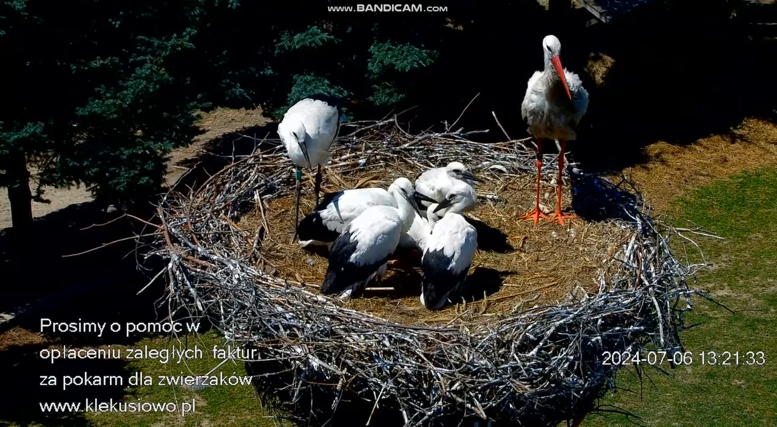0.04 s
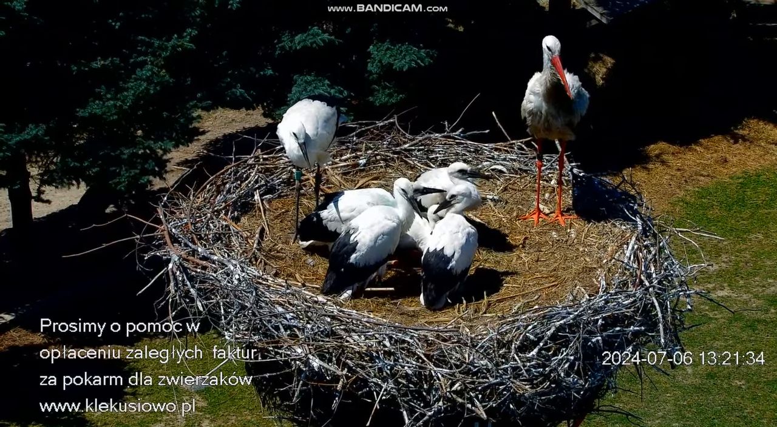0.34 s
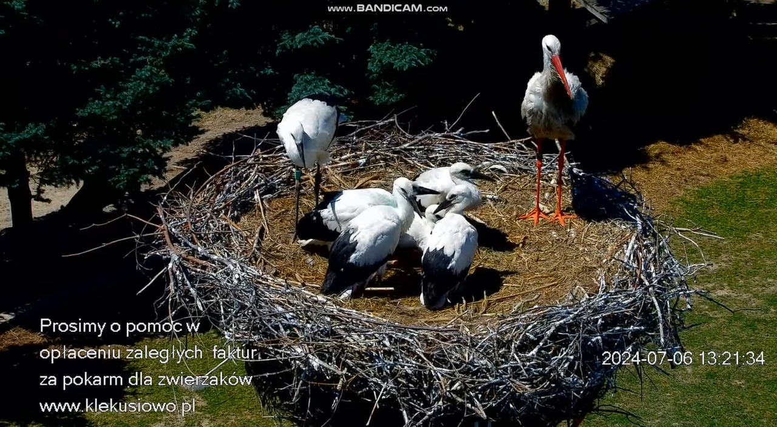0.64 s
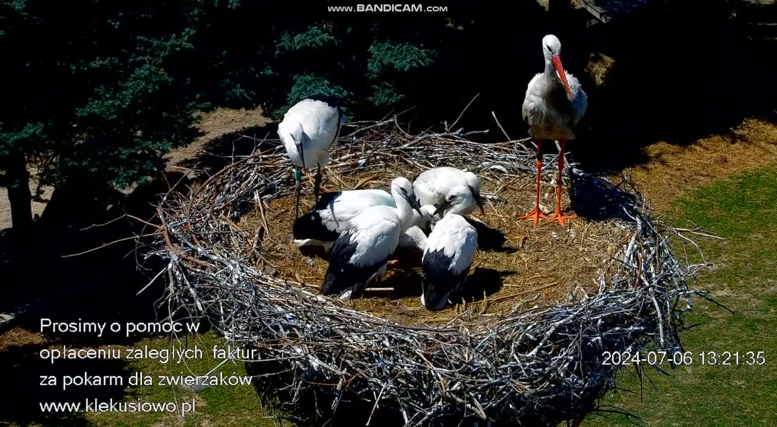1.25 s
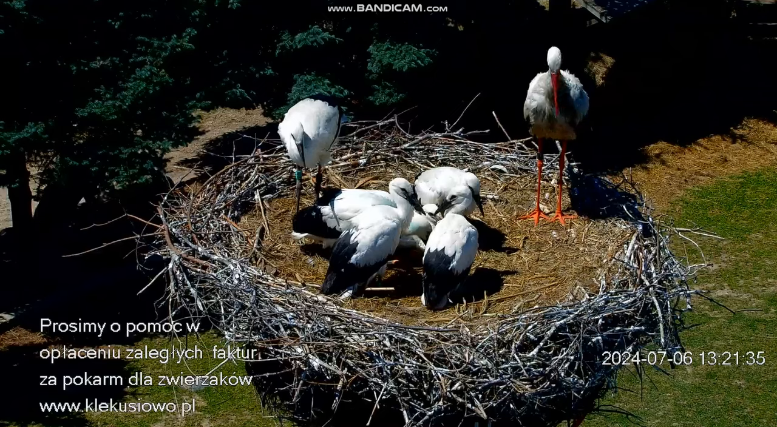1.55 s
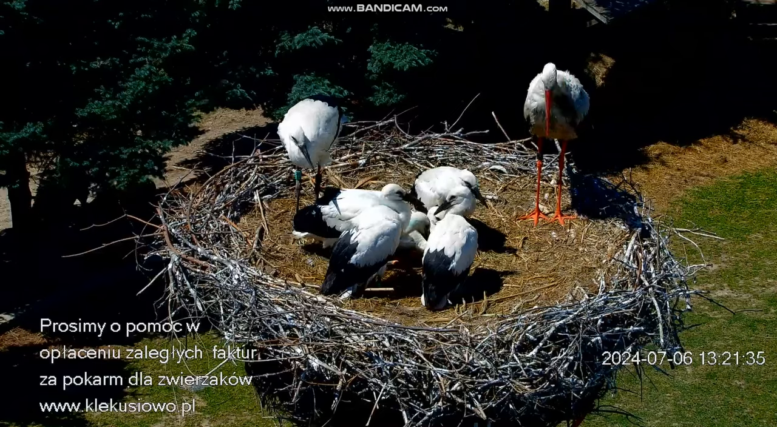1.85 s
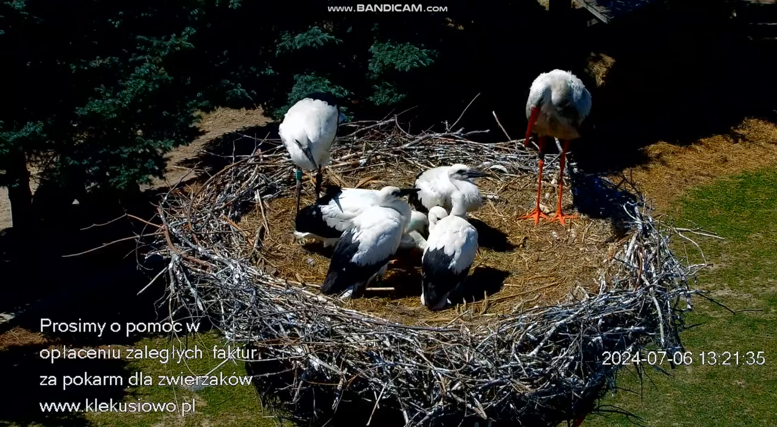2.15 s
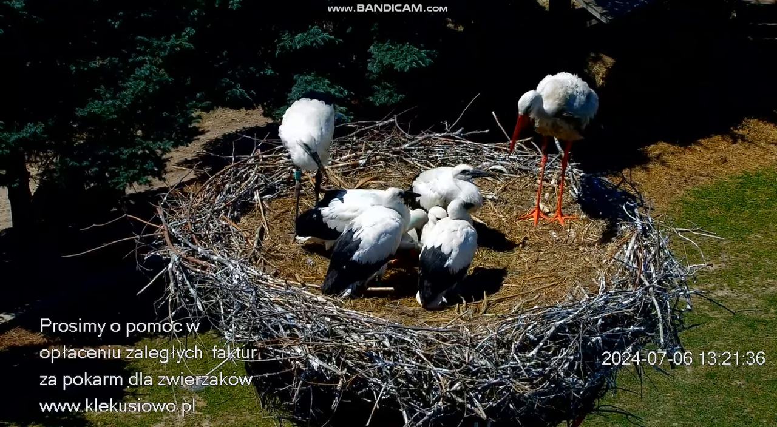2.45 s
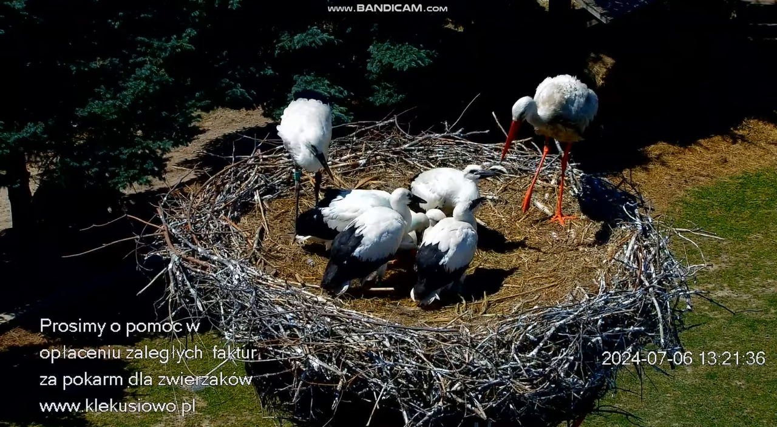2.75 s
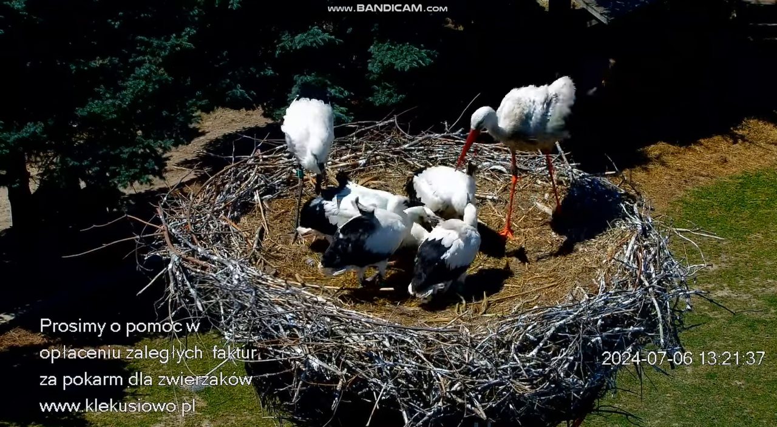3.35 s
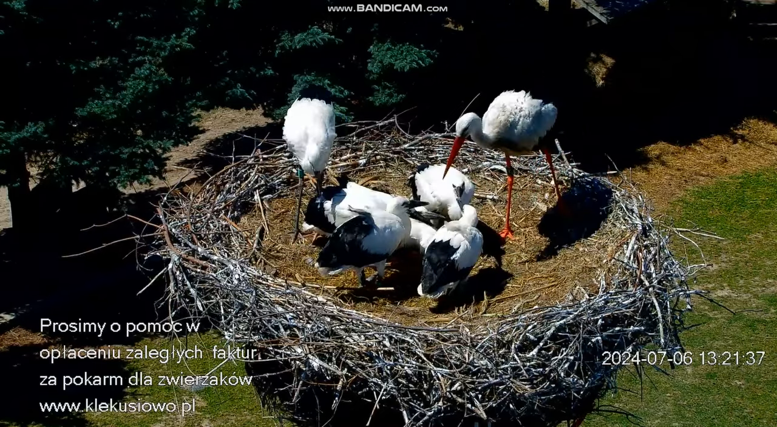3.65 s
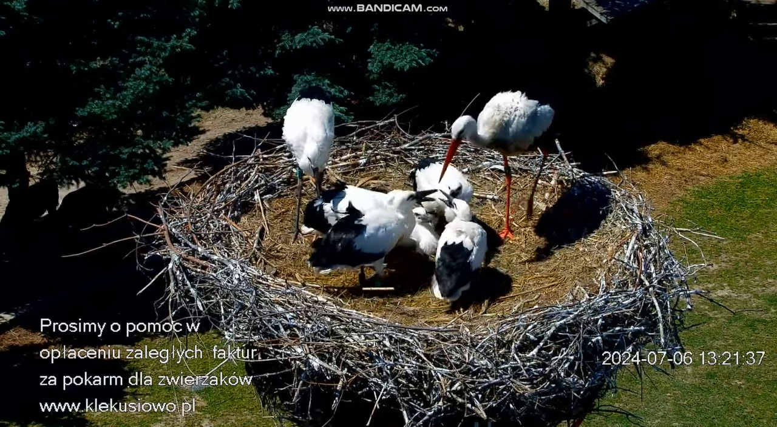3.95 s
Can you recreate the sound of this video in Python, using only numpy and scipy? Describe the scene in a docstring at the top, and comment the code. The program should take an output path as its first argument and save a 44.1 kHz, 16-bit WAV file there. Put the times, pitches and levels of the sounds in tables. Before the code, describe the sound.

Begging stork chicks hiss and whine, growing louder amid wind thumps and small bird chirps.

```python
"""At a big stork nest outdoors, the young beg, swelling as the adult steps closer.
Their thin whines and short squeals are gliding periodic tones; their long hisses are turbulent breath
filtered by throat resonances. A small songbird whistles three chirps, distant birds twitter and nest
twigs rustle. Trees and ground scatter the calls and chirps, while the pressure fluctuations of the
wind rumble and thump on the microphone."""
import sys
import numpy as np
from scipy import signal
from scipy.fft import rfft, irfft
from scipy.io import wavfile

SR = 44100
rng = np.random.default_rng(int(sys.argv[2]) if len(sys.argv) > 2 else 0)


def log_audio(samples):
    """Write samples as a 16-bit WAV file to the path given in sys.argv[1]."""
    # one column per channel
    frames = np.atleast_2d(samples).T
    # limit to full scale, then quantise
    limited = np.clip(frames, -1, 1)
    pcm = np.round(limited * 32767).astype(np.int16)
    wavfile.write(sys.argv[1], SR, pcm)


N = 176400

# Whines: (roughness [0-1], gain of each harmonic [dB], rows of (time [s], pitch [Hz], level [dB]))
WHINE_CONTOURS = [ (0.15, [-15.5, 0], [(0, 849, -48), (.1, 877, -38), (.19, 858, -44.5)]), (0.294, [1.3, 0],
                  [(.33, 711, -53), (.66, 745.4, -51)]), (0.36, [-13, -16.5, 1.5, -15.5],
                  [(.44, 443.6, -43.5), (.5, 432.8, -38), (.59, 416.3, -32), (.63, 435.2, -45),
                  (.68, 433.7, -29), (.75, 427.3, -29.5), (.84, 405, -43.5), (.94, 422.3, -41)]),
                  (0.13, [-14.5, -5, 3, -5.5], [(.712, 548, -28), (.726, 545, -24.5), (.765, 561, -27.5),
                  (.8, 554.7, -35), (.89, 532, -42)]), (0.3933, [-1.5, -2.5, -14.5, -5, -9],
                  [(1.45, 583, -51), (1.61, 545.4, -40), (1.655, 500.3, -42), (1.76, 491.2, -40.5),
                  (1.88, 455.6, -45.5)]), (0.25, [-40.5, 0], [(2.262, 965, -30.5), (2.279, 960, -19),
                  (2.305, 940.2, -23.5), (2.365, 954.6, -34)]), (0.347, [-25, 0, -13.5],
                  [(2.31, 751.2, -36), (2.374, 812.4, -33), (2.386, 812, -22), (2.43, 834.7, -30),
                  (2.51, 821, -25.5), (2.58, 776.6, -29.5), (2.64, 760, -25), (2.71, 715, -28)]),
                  (0.4977, [-17, 0, -12], [(2.77, 715, -30), (2.83, 682.2, -24), (2.9, 668.6, -23.5),
                  (2.96, 658.5, -33.5), (3.14, 622, -33), (3.22, 623, -42.5)]), (1, [-24.5, 0, -13.5],
                  [(3.35, 721, -37.5), (3.44, 770, -23.5), (3.51, 826.4, -24), (3.55, 810.6, -43),
                  (3.61, 801, -22)]), (0.2705, [-23, 2, -50, -15.5], [(3.53, 712.6, -24.5), (3.6, 675, -19),
                  (3.64, 694.4, -22.5), (3.76, 668.4, -22), (3.79, 688, -22), (3.82, 667.3, -25.5),
                  (3.868, 672.7, -20)]), (0.11, [-19, -3, -24.5, -12.5], [(3.94, 659, -33),
                  (3.963, 653, -23.5), (4, 691, -29)]), ]
# Hissing breaths: (start [s], end [s], start level [dB], end level [dB], start tuning [ratio],
# end tuning [ratio], then the gain of each of the four throat resonances [dB])
HISS_BREATHS = [ (0, 0.12, -47.5, -33.5, 1.05, 0.96, -3, -10, -17.5, -13),
                (0.098, 0.292, -34, -35.5, 0.97, 1.035, -10, -8, -7.5, -12),
                (0.31, 0.669, -35, -39, 1, 1.136, -8.5, -15.5, -11, -17.5),
                (0.69, 1.046, -28, -35, 0.9, 0.99, -15.5, -6.5, -10, -16),
                (1.058, 1.698, -40, -42, 0.95, 1.05, -16, -7.5, -3.5, -15),
                (1.698, 2.093, -54, -51, 1.05, 1.03, -5.5, 0, -23.5, -2.5),
                (2.089, 2.223, -46, -27.5, 0.9, 1.015, -6, -9.5, -6, -3),
                (2.22, 2.37, -35, -32.5, 0.94, 1.085, -8.5, 1, -15.5, -7.5),
                (2.386, 2.537, -31.5, -34.5, 1.06, 0.95, -8, 0.5, 2, -7.5),
                (2.532, 2.927, -26, -23.5, 1.012, 0.99, -7.5, -7.5, -6, -18.5),
                (2.923, 3.253, -23, -26, 1.002, 0.94, -5.5, -5.5, -13, -16.5),
                (3.253, 3.576, -26, -29, 1.022, 1.003, -3.5, -10, -7.5, -15),
                (3.584, 3.862, -28.5, -29.5, 0.86, 1.018, -3.5, -4, -6, -1.5), ]
# Throat resonances: (centre at tuning 1 [Hz], width [Hz])
THROAT_FORMANTS = [(1320, 332), (1740, 430), (2200, 480), (2620, 1060)]
# Wind rumble as gusts come and go: (time [s], level [dB])
GUST_LEVELS = [(0, -46), (.35, -43.5), (.5, -37.5), (0.701, -44), (0.922, -23), (1.05, -52), (1.171, -27),
               (1.299, -41.5), (1.899, -42), (2.25, -21), (2.47, -31.5), (2.68, -34.5), (3.178, -13),
               (3.541, -16.5), (3.771, -34), (3.969, -17.5)]
# Spectrum of the rumble: (frequency [Hz], relative density [dB])
RUMBLE_SPECTRUM = [(8, -6), (25, 2), (50, -2), (100, -10.5), (200, -19.5), (330, -19), (500, -38.5),
                   (900, -77)]
# Eddies striking the microphone: (time [s], duration [s], level [dB])
EDDIES = [(0.446, 0.027, -25), (0.525, 0.019, -14.5), (0.711, 0.016, -28.5), (0.808, 0.039, -24.5),
          (0.91, 0.033, -18.5), (1.185, 0.032, -43), (2.015, 0.026, -23.5), (2.104, 0.038, -22),
          (2.148, 0.017, -20.5), (2.181, 0.019, -12.5), (2.241, .025, -18), (2.28, 0.027, -22),
          (2.584, 0.022, -22.5), (2.643, 0.027, -14.5), (2.781, 0.02, -19.5), (2.846, 0.026, -20),
          (2.966, 0.025, -20), (3.155, 0.018, -8), (3.181, 0.0323, -7), (3.221, 0.02, -5),
          (3.392, 0.071, -10), (3.435, 0.028, -13), (3.473, 0.018, -9), (3.552, 0.043, -2.5),
          (3.619, 0.02, -10.5), (3.67, 0.029, -8), (3.797, 0.043, -21), (3.973, 0.077, -13.5)]
# Spectrum of an eddy lasting EDDY_S: (frequency [Hz], relative density [dB])
EDDY_SPECTRUM = [(15, 2), (50, -2), (120, -3), (220, -7), (330, -6.5), (480, -26), (800, -37.5),
                 (4000, -79)]
# Spectrum of the outdoor background: (frequency [Hz], relative density [dB])
AIR_SPECTRUM = [(20, -16.5), (200, -6), (320, 9), (480, 2), (800, -8.5), (1500, -13), (2500, -24.5),
                (5000, -16.5), (7200, -43)]
# Squeals: (start [s], end [s], start pitch [Hz], end pitch [Hz], level [dB])
SQUEAL_GLIDES = [(.16, .26, 1390, 1280, -39), (.28, .35, 1370, 1290, -44), (.68, .725, 490, 450, -36),
                 (.94, 1.0, 365, 340, -37), (1.191, 1.383, 1663, 1743, -45.5), (1.9, 2.05, 2020, 2080, -50),
                 (2.12, 2.24, 1220, 1380, -40.5), (2.53, 2.67, 1300, 1290, -34.5),
                 (3.03, 3.1, 1750, 1640, -30), (3.25, 3.33, 1450, 1340, -29.5)]
# Twig rustles: (time [s], duration [s], level [dB])
TWIG_RUSTLES = [(0.47, 0.039, -47), (3.567, 0.0195, -38), (3.763, 0.045, -50)]
# Spectrum of dry twigs: (frequency [Hz], relative density [dB])
TWIG_SPECTRUM = [(1500, -17.5), (3000, -11), (4800, 10), (6000, -7), (7200, -15)]
# Cheeps of far birds: (time [s], duration [s], pitch [Hz], level [dB])
FAR_CHEEPS = [(0.524, 0.015, 5340, -44), (1.537, 0.069, 3470, -46.5), (1.663, 0.069, 3330, -40.5),
              (3.061, 0.063, 4863, -52), (3.559, 0.044, 5163, -46)]
# One high swish: (time [s], duration [s], level [dB], centre [Hz], width [Hz])
HIGH_SWISH = (.68, .04, -65, 11500, 6500)
# Shape of the songbird's chirp: (time from onset [s], base pitch [Hz], relative level [dB])
CHIRP_CONTOUR = [(0, 3305, -16.5), (.008, 3544, -1), (0.018, 4440, -16.5), (0.036, 4946, -2.5),
                 (0.042, 4566, -14), (.049, 3966, 3.5), (.059, 3814, 7), (0.069, 3270, -9),
                 (.11, 2550, -41), (0.138, 3280, -10.5), (0.149, 3865, -3), (.165, 3625, -8.5),
                 (0.182, 4270, -39)]
# Its three chirps: (start [s], level [dB], pitch factor [ratio], gain at the highest pitch [dB])
CHIRP_CALLS = [(0.89, -29, 1.0, 2.5), (2.326, -28, 0.98, -2), (3.888, -30.5, 1, -5.5)]

CRY_EDGE_S, HISS_EDGE_S = 0.016, 0.0566
RASP_HZ, FLUTTER_DB, PITCH_WAVER = 110, 2.5, .008
JITTER, JITTER_HZ, SHIMMER_DB = 0.04, 141.8, 4.5  # depths at roughness 1
CHEST_HZ, CHEST_DB = 710.5, -14
RING_SPLIT, RING_WAVER = 0.05, .02  # fractions of a formant's centre frequency
EDDY_S, EDDY_DEEPENING, WIND_SIDE_DB = 0.024, 0.42, -29
GARDEN_T60_S, MIC_TOP_HZ, TOP_HZ, SELF_NOISE_DB = 0.61, 7000, 15700, -74.5


def undb(db):
    """Amplitude ratio of a level in decibels."""
    return 10 ** (np.asarray(db) / 20)


def unit(x):
    """Normalisation to rms 1."""
    return x / np.sqrt(np.mean(x ** 2) + 1e-20)


def clock():
    """Sampling instants in seconds."""
    return np.arange(N) / SR


def walk(rate_hz):
    """Low-pass noise: a smooth random wander of rms 1."""
    rolloff = 1 + (np.fft.rfftfreq(N, 1 / SR) / rate_hz) ** 4
    return unit(irfft(rfft(rng.standard_normal(N)) / rolloff, N))


def flutter(depth_db, rate_hz):
    """Random amplitude modulation: a gain of rms 1."""
    return unit(undb(depth_db * walk(rate_hz)))


def noise(spectrum):
    """Spectral shaping of white noise, at rms 1."""
    hz, db = np.array(spectrum).T
    f = np.maximum(np.fft.rfftfreq(N, 1 / SR), 1)
    gain = undb(np.interp(np.log(f), np.log(hz), db))
    return unit(irfft(rfft(rng.standard_normal(N)) * gain, N))


def phase_of(hz):
    """Phase as the time integral of frequency."""
    return 2 * np.pi * np.cumsum(hz) / SR


def gate(start, end, edge_s):
    """Envelope with quarter-sine edges centred on start and end."""
    t = clock()
    rise = np.sin(np.pi / 2 * np.clip((t - start) / edge_s + .5, 0, 1))
    fall = np.sin(np.pi / 2 * np.clip((end - t) / edge_s + .5, 0, 1))
    return rise * fall


def burst(x, at, length):
    """Gaussian windowing: a short swell of x with rms about 1 at its middle."""
    bell = np.exp(-np.minimum((2 * (clock() - at) / length) ** 2, 20))
    return x * bell * np.sqrt(np.sum(bell ** 2) / np.sum((x * bell) ** 2))


def resonance(hz, width_hz):
    """Noise-driven resonance: a steep band of rms 1 about a steady or moving centre."""
    skirt = 1 + np.abs(2 * np.fft.fftfreq(N, 1 / SR) / width_hz) ** 4.4
    baseband = np.fft.ifft((rng.standard_normal(N) + 1j * rng.standard_normal(N)) / skirt)
    return unit(np.real(baseband * np.exp(1j * phase_of(np.full(N, hz)))))


def whines():
    """Periodic vibration gives a harmonic series; jitter in pitch and shimmer in level roughen it."""
    t, out = clock(), 0
    flutters = [flutter(FLUTTER_DB, 38) for _ in range(max(len(w[1]) for w in WHINE_CONTOURS))]
    for roughness, harmonics_db, contour in WHINE_CONTOURS:
        at, hz, db = np.array(contour).T
        waver = 1 + roughness * JITTER * walk(JITTER_HZ) + PITCH_WAVER * walk(20.1)
        phase = phase_of(np.interp(t, at, hz) * waver)
        voice = sum(undb(h) * flutters[k] * np.sin((k + 1) * phase) for k, h in enumerate(harmonics_db))
        level = undb(np.interp(t, at, db) + roughness * SHIMMER_DB * walk(RASP_HZ))
        out += np.sqrt(2) * voice * level * gate(at[0], at[-1], CRY_EDGE_S)
    return out


def hisses():
    """Source and filter: turbulent breath excites throat formants that glide together."""
    t, tuning, total_effort = clock(), 1e-9, 1e-9
    powers = np.zeros((len(THROAT_FORMANTS), N))
    for start, end, db0, db1, tune0, tune1, *formant_db in HISS_BREATHS:
        effort = gate(start, end, HISS_EDGE_S) * undb(np.interp(t, [start, end], [db0, db1]))
        powers += (undb(formant_db)[:, None] * effort) ** 2
        tuning += effort * np.interp(t, [start, end], [tune0, tune1])
        total_effort += effort
    tuning /= total_effort  # overlapping breaths blend their tunings
    chest_level = undb(CHEST_DB) * np.sqrt(powers[0]) * flutter(2 * FLUTTER_DB, 12)
    breath = chest_level * resonance(CHEST_HZ * tuning, width_hz=100)
    for power, (hz, width) in zip(powers, THROAT_FORMANTS):
        # A broad band shares the power equally with a pair of narrow rings just above and below its centre.
        rings = unit(sum(resonance(hz * tuning * (1 + split + RING_WAVER * walk(7)), width_hz=35)
                         for split in (-RING_SPLIT, RING_SPLIT)))
        breath += np.sqrt(power / 2) * flutter(FLUTTER_DB, 16.6) * (resonance(hz * tuning, width) + rings)
    return breath * flutter(depth_db=1.57, rate_hz=RASP_HZ)


def wind():
    """Turbulent pressure on the microphone: gusts rumble and eddies thump, the longer the deeper."""
    at, db = np.array(GUST_LEVELS).T
    mid = noise(RUMBLE_SPECTRUM) * undb(np.interp(clock(), at, db)) * flutter(4, 14)
    side_band, side = resonance(254, width_hz=290), 0
    for at, length, db in EDDIES:
        pitch_factor = (EDDY_S / length) ** EDDY_DEEPENING
        thump = noise(np.array(EDDY_SPECTRUM) * [pitch_factor, 1])
        mid += undb(db) * burst(thump, at, length)
        side += undb(db + WIND_SIDE_DB) * burst(side_band, at, length)
    return np.array([mid + side, mid - side])


def outdoor_air(level_db=-46.5):
    """Ambient noise: a broad spectrum whose level wavers."""
    return noise(AIR_SPECTRUM) * undb(level_db + 2.5 * walk(10))


def twitter(level_db=-60.5, spread_db=6.5):
    """Superposition of distant birds: narrow noise bands swell and fade independently."""
    pitches, specks = np.geomspace(3300, 6700, 14), 0
    for hz in pitches:
        rolloff = (pitches[0] / hz) ** 1.5
        specks += resonance(hz, width_hz=200) * undb(spread_db * np.minimum(walk(23), 2)) * rolloff
    return undb(level_db) * unit(specks)


def squeals():
    """Nearly sinusoidal vibration: short stork cries that glide and waver."""
    t, out = clock(), 0
    for start, end, hz0, hz1, db in SQUEAL_GLIDES:
        hz = np.interp(t, [start, end], [hz0, hz1]) * (1 + PITCH_WAVER * walk(RASP_HZ))
        level = undb(db + FLUTTER_DB * walk(RASP_HZ))
        out += np.sqrt(2) * np.sin(phase_of(hz)) * level * gate(start, end, CRY_EDGE_S)
    return out


def twigs():
    """Friction noise: dry sticks and straw crackle as the birds shift."""
    crackle = unit(noise(TWIG_SPECTRUM) * flutter(4, 400))
    return sum(undb(db) * burst(crackle, at, length) for at, length, db in TWIG_RUSTLES)


def cheeps():
    """Narrow-band noise carries a pitch: brief bursts of it are the cheeps of far birds."""
    return sum(undb(db) * burst(resonance(hz, width_hz=520), at, length)
               for at, length, hz, db in FAR_CHEEPS)


def swish():
    """Band-limited noise in one short swell: a faint wisp of high treble."""
    at, length, db, hz, width = HIGH_SWISH
    return undb(db) * burst(resonance(hz, width), at, length)


def songbird():
    """Frequency modulation of a pure tone: an arched whistle, then an upslurred second note."""
    t, out = clock(), 0
    at, hz, db = np.array(CHIRP_CONTOUR).T
    crest = hz == hz.max()
    for start, level_db, pitch_factor, crest_db in CHIRP_CALLS:
        pitch = pitch_factor * np.interp(t - start, at, hz) * (1 + 0.018 * walk(300))
        level = undb(level_db + np.interp(t - start, at, db + crest_db * crest) + 0.55 * walk(200))
        out += np.sqrt(2) * np.sin(phase_of(pitch)) * level * gate(start, start + at[-1], edge_s=.004)
    return out


def garden(x, wet_db, low_hz):
    """Scattering from trees and ground adds an exponentially decaying tail, weak below low_hz."""
    t = clock()[:SR]
    tail = rng.standard_normal(SR) * np.exp(-np.log(1000) * t / GARDEN_T60_S) * (t > .006)
    scattered = signal.sosfilt(signal.butter(4, low_hz, "high", fs=SR, output="sos"), x)
    return x + undb(wet_db) * signal.fftconvolve(scattered, tail / np.sqrt(np.sum(tail ** 2)))[:N]


def lowpass(x, hz):
    """Band limiting by a steep elliptic filter."""
    return signal.sosfilt(signal.ellip(8, .2, 70, hz, fs=SR, output="sos"), x)


def scene():
    """Linear superposition of nest, garden and wind; only the wind has stereo width."""
    air = outdoor_air()
    storks = garden(whines() + squeals() + hisses(), wet_db=-16, low_hz=200)
    small_birds = garden(songbird() + cheeps(), wet_db=-7.5, low_hz=4300)
    return storks + small_birds + twitter() + twigs() + air + wind()


def record(dry):
    """Saturation rounds the hardest buffets and the treble is cut; self-noise and the swish join."""
    saturated = dry / (1 + dry ** 8) ** (1 / 8)
    fade_out = np.minimum(clock()[::-1] / .004, 1)
    heard = lowpass(saturated, MIC_TOP_HZ) * fade_out
    return lowpass(heard + swish() + undb(SELF_NOISE_DB) * rng.standard_normal(N), TOP_HZ)


dry = scene()
out = record(dry)
log_audio(out)
```